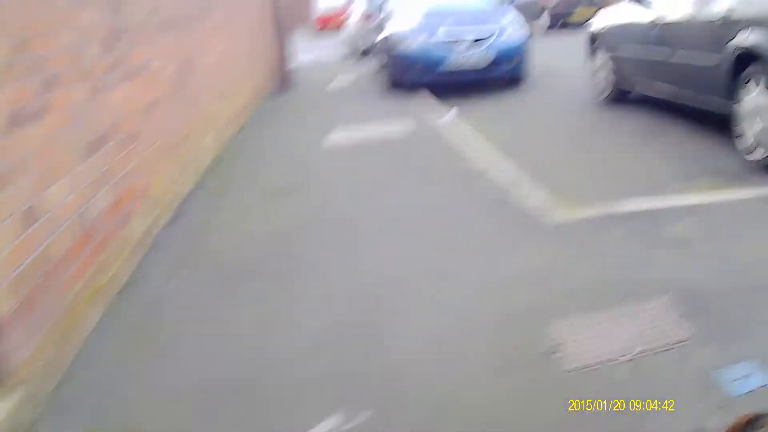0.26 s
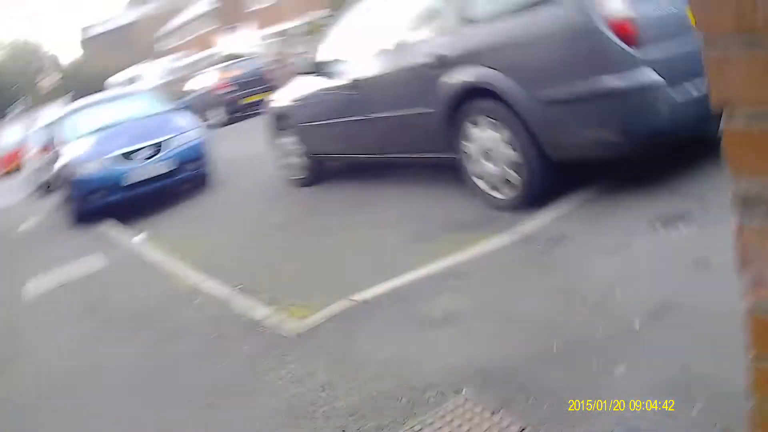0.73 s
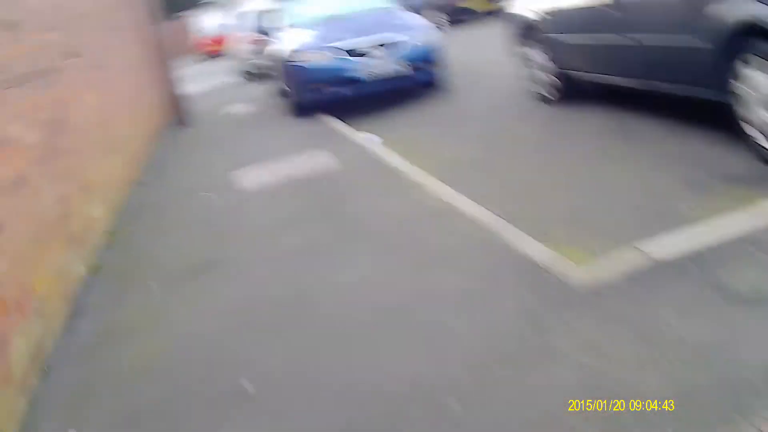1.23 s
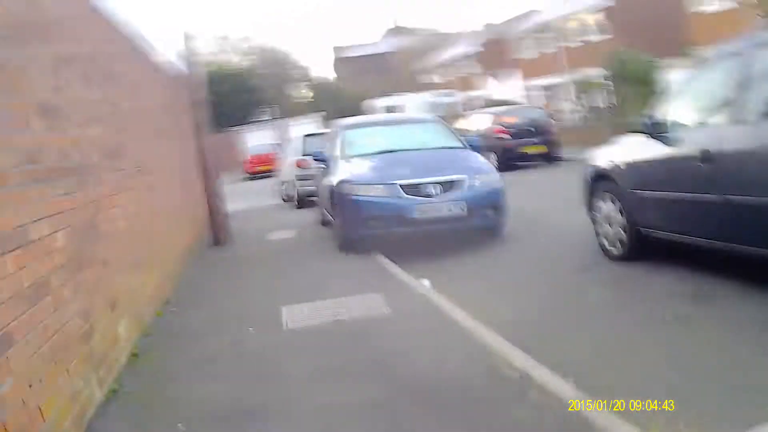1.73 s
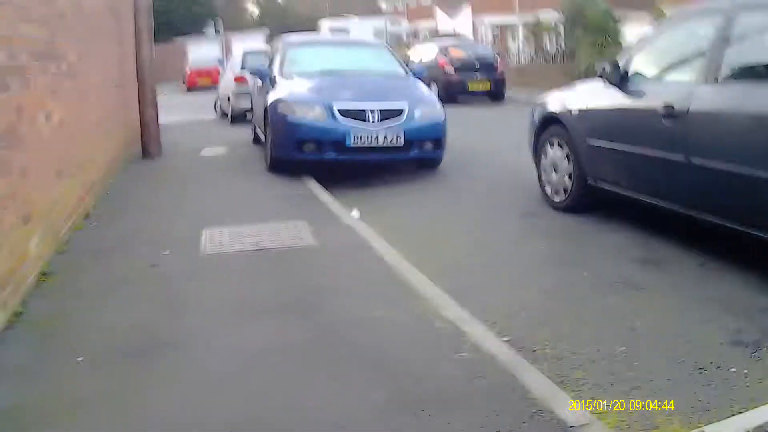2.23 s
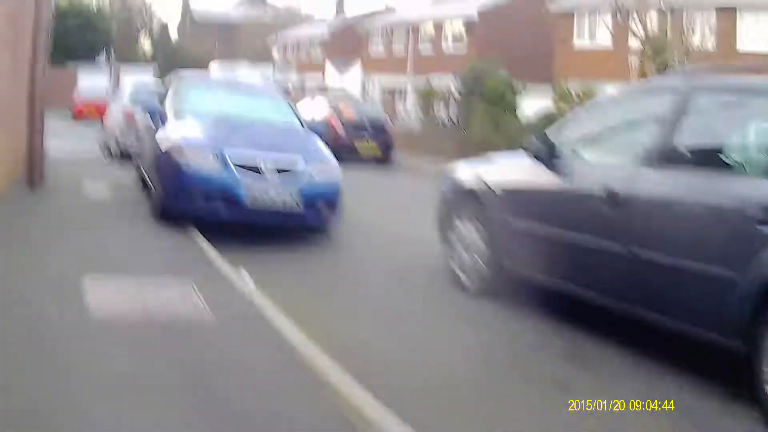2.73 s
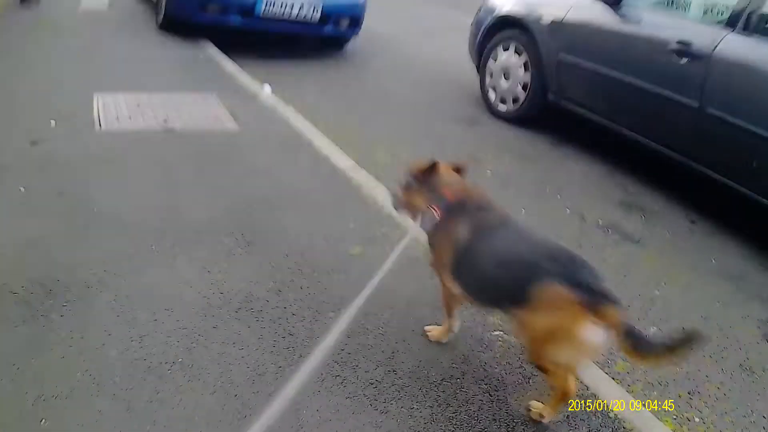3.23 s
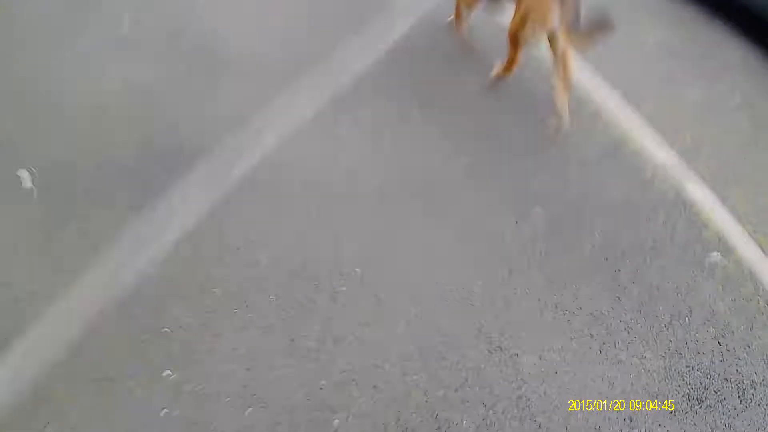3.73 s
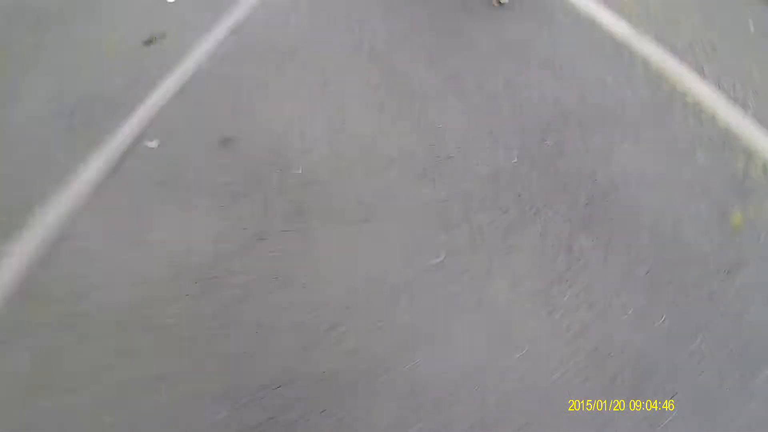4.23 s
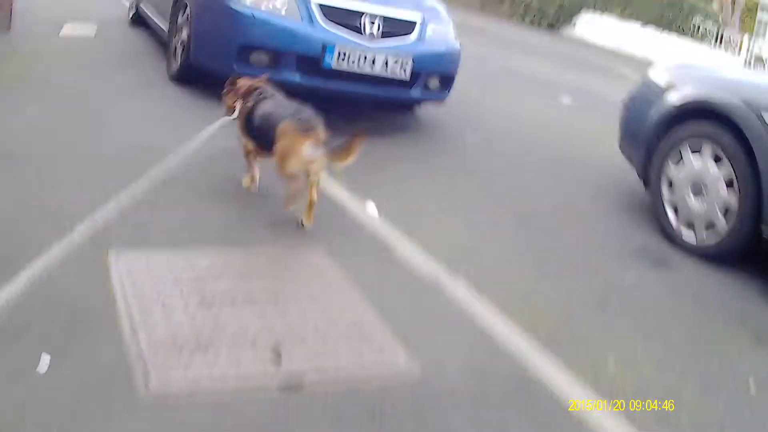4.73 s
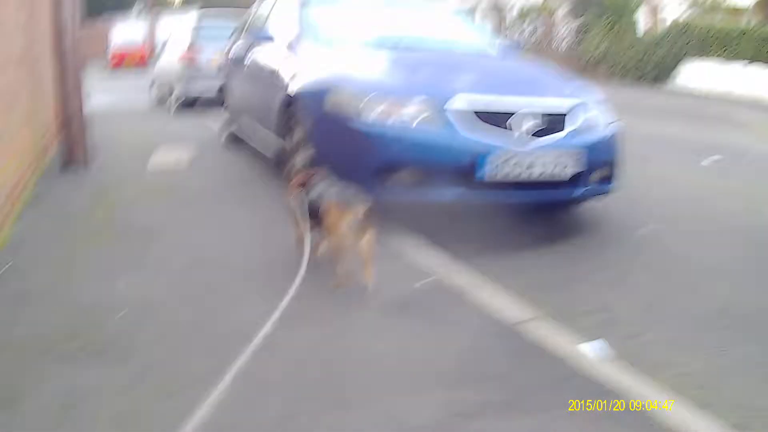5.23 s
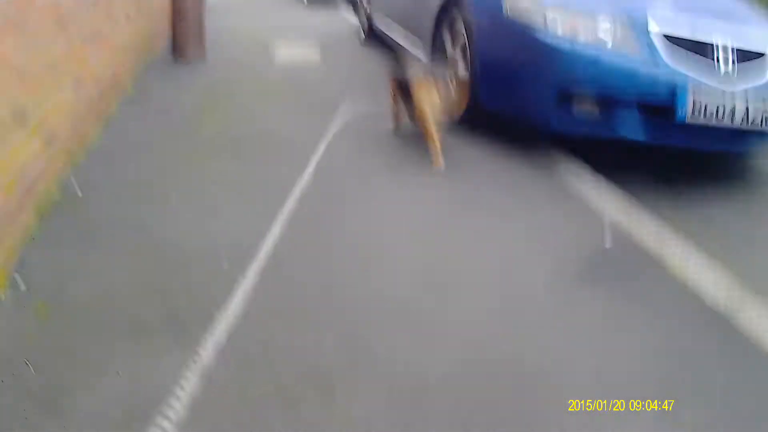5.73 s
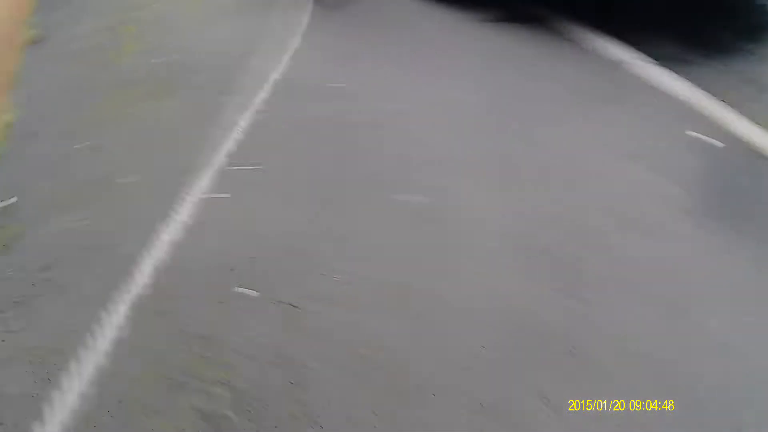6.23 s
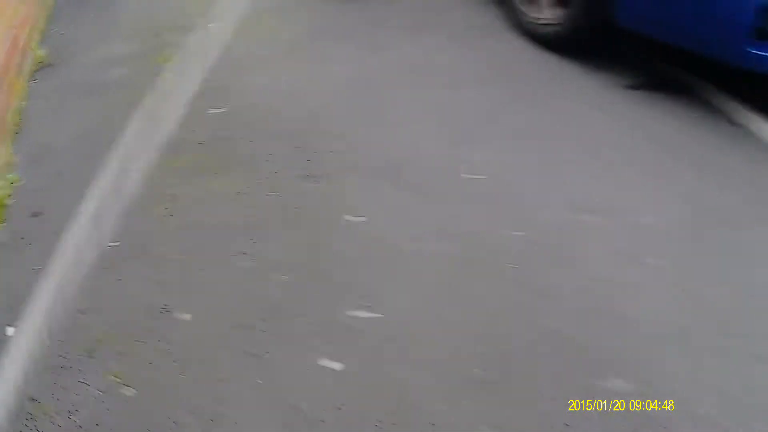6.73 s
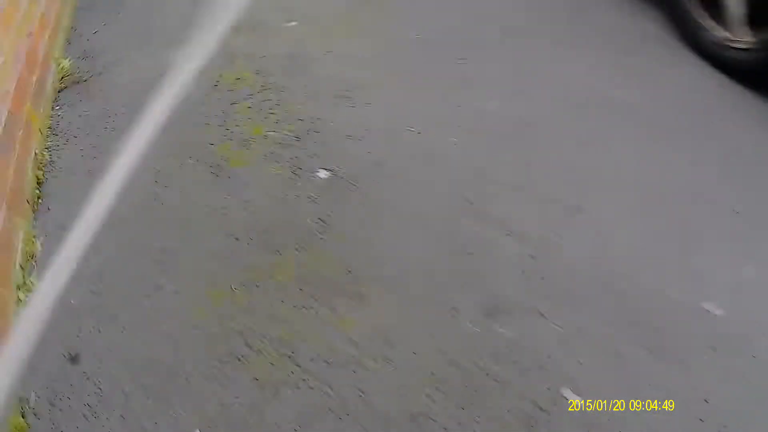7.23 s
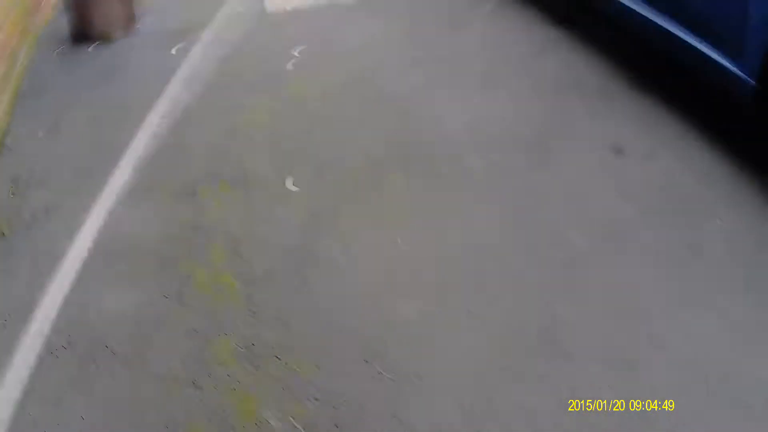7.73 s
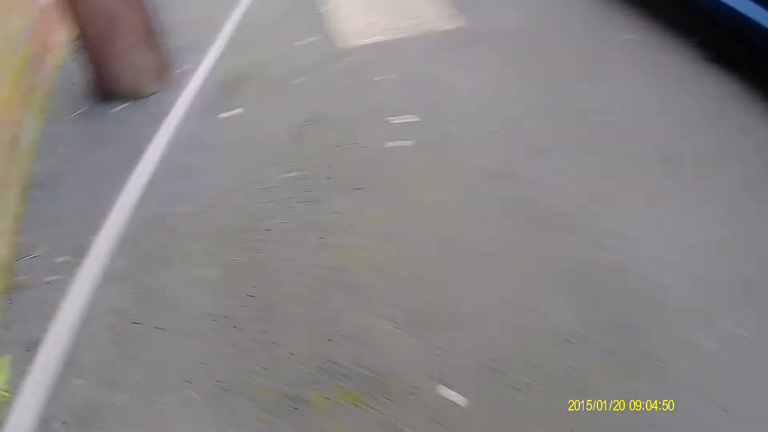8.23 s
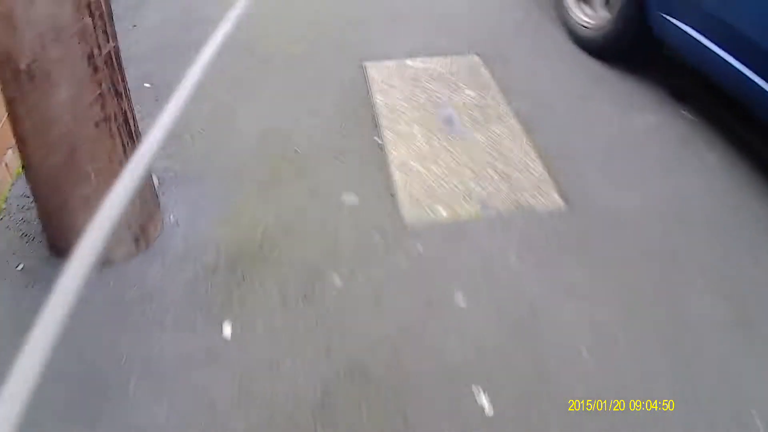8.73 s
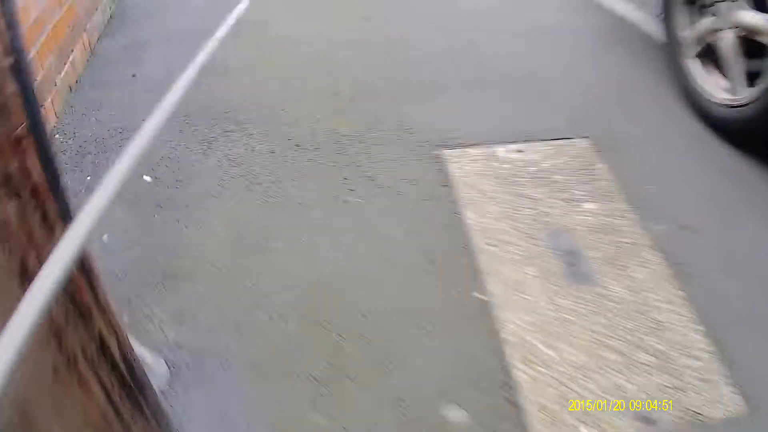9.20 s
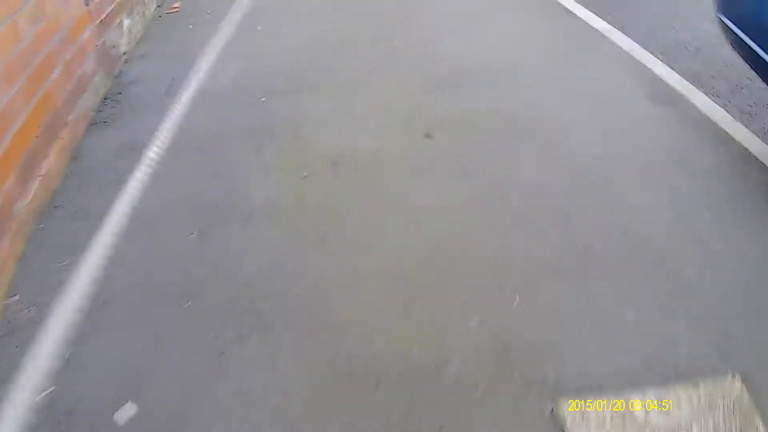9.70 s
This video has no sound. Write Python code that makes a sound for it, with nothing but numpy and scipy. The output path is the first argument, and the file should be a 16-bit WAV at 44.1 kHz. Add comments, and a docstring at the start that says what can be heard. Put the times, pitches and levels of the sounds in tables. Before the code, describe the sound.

Outdoors on a quiet paved street, a body-worn microphone catches fabric brushing in short, dry, irregular strokes. The roughest rubbing and plasticky knocks come in the second and third seconds, followed by tiny high metal clinks from the lead and soft low bumps. Afterwards it is much quieter: sparse scuffs, dull taps, fine ticks and one muffled blow late on, over low wind and distant hiss.

```python
"""A walker with a dog on a lead goes along a quiet paved lane, a small camera worn on the body.
Clothing rubs lightly over the camera, a lead part clinks, grit and claws tick; from 1.6 s the rubbing
is at its loudest, blows ring the casing around 2 and 2.5 s and the camera bumps the body.
A run of clinks follows from 3.3 to 4 s, then the rubbing thins out, with one dull blow at 7.7 s.
Under it all: noise-made wind on the microphone, a far hum of wavering pitch and the hiss of the street."""
import sys
import numpy as np
from scipy import signal
from scipy.fft import rfft, irfft
from scipy.io import wavfile
from scipy.ndimage import uniform_filter1d

SR = 44100
rng = np.random.default_rng(int(sys.argv[2]) if len(sys.argv) > 2 else 0)


def waveform_to_disk(signal):
    """Save audio, clipped to [-1, 1], as 16-bit WAV at the path in sys.argv[1]."""
    frames = np.transpose(np.atleast_2d(signal))
    scaled = np.clip(frames, -1, 1) * 32767
    samples = np.round(scaled).astype(np.int16)
    wavfile.write(sys.argv[1], SR, samples)


N = 439236
EDGE_HZ = 12900  # upper band limit

# colours of cloth and casing noise, relative spectra: f/Hz, level/dB per Hz
DULL_COLOUR = [(300, -38), (500, -15.5), (660, -7), (750, -10.5), (840, -0.5), (972, 0.5), (1250, -9),
               (1530, -5), (1790, -22), (2050, -7), (2120, -8), (2290, -13), (2800, -27), (3400, -43.5)]
SCRATCH_COLOUR = [(2200, -26), (2600, -6.5), (3230, -7), (4100, -2), (4500, -4.5), (5500, -7), (6000, -23)]
BRIGHT_COLOUR = [(5000, -32.5), (5700, -6.5), (6100, -2), (6700, -1.5), (7400, -2), (8500, 4), (9600, -4),
                 (11500, -5), (13500, -11)]
# light rustle between the strokes: t/s, dull rub level/dB, bright swish against it/dB
RUSTLE_LEVELS = [(0, -87, 14), (.5, -76, 5), (1.2, -72.5, 3.5), (2, -64.5, 1), (2.7, -64.5, -2),
                 (3.1, -70, 5), (3.6, -70, -2.5), (4.5, -73, -3.5), (5.2, -74.5, -4), (6.2, -79.5, -4),
                 (7.2, -77, -2.5), (8.3, -79, -0.5), (8.9, -77, -6.5), (9.15, -86, 0), (9.96, -72.5, -6)]


def amp(db):
    """Gain of a level in dB."""
    return 10 ** (np.asarray(db) / 20)


def evened(x):
    """Scales to rms 1."""
    return x / np.sqrt(np.mean(x ** 2) + 1e-20)


def curve(table):
    """Columns of a table after its times, drawn out to one value a sample."""
    s, *columns = np.transpose(table)
    return [np.interp(np.arange(N) / SR, s, c) for c in columns]


def coloured(x, points):
    """Filters x by a spectrum, drawn over log frequency, and scales it to rms 1."""
    f, db = np.transpose(points)
    hz = np.fft.rfftfreq(len(x), 1 / SR)
    gain = amp(np.interp(np.log(hz + 1), np.log(f + 1), db, -90, -90))
    return evened(irfft(rfft(x) * gain, len(x)))


def flicker(per_s):
    """Slow random curve of rms 1, with per_s new points a second."""
    points = rng.standard_normal(N // 40 + 2)
    at = np.arange(N) * per_s / SR
    return evened(np.interp(at, np.arange(len(points)), points))


def add(mix, s, sound):
    """Mixes a sound in at time s."""
    part = mix[round(s * SR):][:len(sound)]
    part += sound[:len(part)]


def ring(modes, t, rise):
    """Sum of dying sines (f/Hz, level/dB, t60/s) that build up over the contact time."""
    sines = sum(amp(db - 60 * t / t60) * np.sin(2 * np.pi * hz * t) for hz, db, t60 in modes)
    return sines * (1 - np.exp(-t / rise))


def snaps(low_hz, high_hz, per_s, t60):
    """Tiny ringing clicks of scattered size, at random times on eight pitches, rms 1."""
    t, out = np.arange(512) / SR, np.zeros(N)
    for hz in np.geomspace(low_hz, high_hz, num=8):
        sizes = amp(4.0 * np.minimum(rng.exponential(1, N), 4))
        train = sizes * (rng.random(N) < per_s / SR / 8)
        out += signal.oaconvolve(train, ring([(hz, 0, t60)], t, .0001))[:N]
    return evened(out)


def clothing():
    """Fibres catch and slip: clumped noise whose colour shifts in patches, with snaps on top."""
    patch_db, scratch_db = 2.5, -8.5  # depth of the swish's colour patches, gain of the scratch
    dull_gain, scratch_gain, bright_gain = pressure()
    clumps = flicker(per_s=70)

    dull = coloured(rng.standard_normal(N), DULL_COLOUR) + 0.31 * snaps(920, 2150, 150, .018)
    dull *= dull_gain * amp(2.0 * clumps + .8 * flicker(per_s=90))

    scratch = coloured(rng.standard_normal(N), SCRATCH_COLOUR) + .5 * snaps(2700, 5200, 200, 0.0018)
    scratch *= scratch_gain * amp(scratch_db + 0.63 * clumps)

    z = signal.stft(coloured(rng.standard_normal(N), BRIGHT_COLOUR), SR, nperseg=256)[2]
    # random gains, smoothed over frequency and then over time
    patches = uniform_filter1d(rng.standard_normal(z.shape), size=8, axis=0)
    patches = evened(uniform_filter1d(patches, size=12, axis=1))
    patchy = signal.istft(z * amp(patch_db * patches), SR, nperseg=256)[1][:N]
    swish = evened(patchy) + 0.3 * snaps(6000, 14000, 200, 0.0061)
    swish *= bright_gain * amp(1.9 * clumps)
    return dull + scratch + swish


def pressure():
    """Gains of dull rub, scratch and swish: arched strokes over the light rustle, summed as power."""
    # strokes of clothing across the camera:
    # start t/s, length/s, dull rub level/dB before the arch, bright swish against it/dB
    rubs = [(0.0, 0.16, -69.5, -1), (0.525, 0.093, -68, 1), (0.628, 0.07, -69.5, 2.5),
            (0.716, 0.16, -63, 0), (1.022, 0.12, -61.5, 0), (1.107, 0.087, -62, 1),
            (1.23, 0.044, -65.5, -2), (1.296, 0.17, -60, -1), (1.6, 0.04, -53, 0), (1.664, 0.062, -56.5, 6),
            (1.743, 0.11, -55.5, 9.5), (1.895, 0.037, -61, 13), (1.958, 0.026, -61, 4),
            (2.01, 0.019, -58, -8), (2.056, 0.028, -48.5, -24), (2.09, 0.043, -48, 3.5),
            (2.111, 0.065, -59.5, 0), (2.206, 0.058, -55, 9), (2.307, .09, -58, 6),
            (2.444, 0.11, -49, 10.5), (2.496, 0.055, -41, -10), (2.583, 0.13, -63, 7.5),
            (2.78, .17, -56.5, 3.5), (2.89, 0.062, -64, 13.5), (2.924, 0.049, -58, 14),
            (3.206, 0.17, -63.5, -0.5), (3.302, 0.16, -62.5, -1), (3.449, 0.049, -60, 7.5),
            (3.664, 0.035, -56, -0.5), (3.745, 0.22, -69, -12.5), (3.987, 0.13, -63, 1.5),
            (4.16, 0.26, -65.5, 0), (4.434, 0.014, -64.5, 6.5), (4.688, 0.12, -63.5, -1.5),
            (4.957, 0.14, -65, 5), (5.198, 0.15, -76.5, 2), (5.381, 0.089, -54, 3),
            (5.588, 0.15, -59.5, -4), (5.725, 0.068, -58.5, -3), (5.786, 0.17, -59, -4),
            (6.014, 0.059, -61.5, -0.5), (6.268, 0.057, -74, 6), (6.53, 0.096, -70.5, -12.5),
            (6.68, 0.11, -72.5, -7), (6.927, 0.07, -69.5, -6), (7.052, 0.034, -77.5, 8),
            (7.382, 0.033, -67, -3), (7.461, 0.051, -64.5, -3), (7.604, 0.22, -75, -1),
            (7.727, 0.069, -67, -19), (7.854, 0.04, -69.5, -7), (8.004, 0.036, -72.5, 1.5),
            (8.134, 0.056, -66.5, -1), (8.224, 0.072, -70.5, 4), (8.382, 0.044, -71, -7),
            (8.46, 0.029, -67, 1), (8.676, 0.051, -70.5, -7), (9.213, 0.15, -70.5, -5.5),
            (9.314, 0.2, -69.5, -4.5), (9.593, 0.072, -68.5, -3.5), (9.726, 0.041, -74, 0),
            (9.85, 0.16, -72, -7)]
    arch_db, peak_at = 12, 0.3  # drop at the ends of a stroke, share of its length where it is strongest
    rise_db_per_s, fall_db_per_s = 898.5, 599.5  # slopes outside the ends
    shares = np.array([[0], [0.23], [1]])  # how far each layer follows the swish column
    rustle_db, against_db = curve(RUSTLE_LEVELS)
    power = amp(rustle_db + shares * against_db) ** 2
    for s, length, db, bright_db in rubs:
        first = max(round((s - .1) * SR), 0)
        last = min(round((s + length + .15) * SR), N)
        at = np.arange(first, last)
        t = at / SR - s
        bow_db = -arch_db * np.interp(t / length, [0, peak_at, 1], [1, 0, 1]) ** 2
        ends_db = rise_db_per_s * np.minimum(t, 0) - fall_db_per_s * np.maximum(t - length, 0)
        power[:, at] += amp(db + shares * bright_db + bow_db + ends_db) ** 2
    return np.sqrt(power)


def knocks():
    """Each blow rings the parts of the casing by its own shares, fills the lows with a dull puff and cracks."""
    # blows on the casing: t/s, main ring level/dB,
    # then against it: boom/dB, thud/dB, lower shell/dB, upper shell/dB, crack/dB
    blows = [(1.9493, -1.5, -27, -14.5, -16, -5.5, -13.5), (2.1112, -10, -9, -1, -12, -20, -10.5),
             (2.4859, -16, -17.5, -5.5, -2, 0.5, -13), (2.498, -22.5, -17.5, -2, -8.5, -11, -26),
             (7.7312, -37, -7, 9, -5.5, -6, -12)]
    # modes of main ring, boom, thud, lower shell, upper shell, rim in turn: f/Hz, level/dB, t60/s
    casing = [
        [(2082, 0.5, 0.03), (2101, -31, 0.097)],
        [(75, -1.5, .05)],
        [(185, -8, 0.025), (268.5, -10, 0.021), (404.3, -5.5, 0.017), (500, -5, 0.011), (670, -1, 0.022),
         (980, -1.5, .012), (1200, -2.5, .011)],
        [(1560, -1, 0.025)],
        [(2385, -1.5, 0.016), (2560, -12, .01)],
        [(4100, -5, 0.0071), (4300, -5, 0.006), (4470, -2, 0.012)],
    ]
    # sign of each part: the shells swing against the main ring
    swing = [1, 1, 1, -1, -1, 1]
    rim_db = 4.5  # the rim rings with the crack
    out, t = np.zeros(N), np.arange(SR // 6) / SR
    noise = rng.standard_normal((len(blows), 3, len(t)))
    for (s, db, boom_db, thud_db, lower_db, upper_db, crack_db), (a, b, c) in zip(blows, noise):
        shares = amp([0, boom_db, thud_db, lower_db, upper_db, crack_db + rim_db]) * swing
        body = sum(share * ring(modes, t, .0003) for share, modes in zip(shares, casing))
        puff = coloured(a, DULL_COLOUR) * amp(thud_db - 3.0 - 60 * t / 0.018)
        crack = coloured(b, BRIGHT_COLOUR) + 0.86 * coloured(c, SCRATCH_COLOUR)
        crack *= amp(crack_db + 1.5 - 60 * t / 0.015)
        onset = 1 - np.exp(-t / .0005)
        add(out, s, amp(db) * (body + (puff + crack) * onset))
    return out


def bumps():
    """The camera softly bumps the body: one low push and its rebound under a bell-shaped window."""
    # soft bumps: middle t/s, level of the bell's top/dB, f/Hz
    pushes = [(1.613, -37, 133), (2.069, -37, 292), (3.217, -50, 164.6), (3.291, -53, 148),
              (3.401, -45.5, 186), (3.446, -45.5, 148), (3.628, -53, 197), (3.693, -49.5, 243),
              (3.856, -41.5, 187), (3.898, -45.5, 183), (4.016, -37.5, 190), (4.234, -70, 173),
              (5.425, -47, 151.8), (6.614, -51, 162.8), (6.89, -48.5, 203), (7.389, -52, 220.5),
              (8.396, -53, 164), (9.026, -46, 160.5), (9.414, -53.5, 207), (9.915, -52.5, 162.8)]
    bell_cycles = 0.75  # width of the bell between its 1/e points
    out, t = np.zeros(N), np.arange(-1024, 1024) / SR
    for s, db, hz in pushes:
        bell = np.exp(-(2 * t * hz / bell_cycles) ** 2)
        add(out, s + t[0], amp(db) * bell * np.cos(2 * np.pi * hz * t + np.pi / 4))
    return out


def lead():
    """Small metal parts of the lead ring high, with a rattle at the strike."""
    # clinks: t/s, level/dB, f/Hz, t60/s, rattle against the level/dB
    clinks = [(0.2386, -40.5, 5290, 0.036, -2.5), (3.2568, -42.5, 9100, 0.019, -6.5),
              (3.285, -30, 9160, 0.08, -12), (3.3263, -29, 8100, 0.032, -8),
              (3.331, -31, 11600, 0.021, -18), (3.35, -46, 8500, .03, -8), (3.3674, -50, 8900, 0.02, -4),
              (3.386, -30.5, 10360, 0.016, -9), (3.39, -44, 11100, .06, -2), (3.453, -44, 12630, 0.045, 2),
              (4.014, -39.5, 8900, 0.011, 2.5), (4.054, -44, 12340, 0.034, -4)]
    # partials of a clink, the close pair beats: factor on f, level/dB
    partials = [(1, -5), (1.002, -5), (.645, -21), (1.36, -23)]
    out, t = np.zeros(N), np.arange(SR // 6) / SR
    rattles = rng.standard_normal((len(clinks), len(t)))
    for (s, db, hz, t60, rattle_db), noise in zip(clinks, rattles):
        modes = [(hz * k, d, t60) for k, d in partials if hz * k < EDGE_HZ]
        rattle = coloured(noise, BRIGHT_COLOUR) * amp(rattle_db - 60 * t / .015)
        add(out, s, amp(db) * (ring(modes, t, 0.001) + rattle))
    return out


def ticks():
    """Grit, claws and small taps: a short noise burst around its centre pitch under a bright click."""
    # ticks: t/s, burst level at the strike/dB, centre f/Hz, bright click against the burst/dB
    taps = [(.364, -54, 1110, -24), (.538, -53.5, 2260, 1), (.665, -55.5, 10300, 7.5),
            (.907, -53, 5730, -19), (.959, -53, 8500, -12), (1.001, -45, 5400, -16),
            (1.492, -47.5, 2330, -0.5), (1.562, -56, 8300, 7), (1.599, -44, 6300, -8),
            (1.619, -37.5, 6900, -3.5), (1.87, -43, 10200, -3), (1.881, -50, 3100, -4),
            (1.905, -47, 3820, -4), (1.917, -48, 4500, -4), (2.036, -43.5, 700, -22),
            (2.068, -33, 800, -21), (2.1, -38, 2080, -23), (2.217, -49, 7430, -12), (2.265, -45, 3970, 2),
            (2.323, -40, 9500, -15), (2.374, -34.5, 5440, -18), (2.416, -50.5, 3100, 7.5),
            (2.645, -45.5, 950, -12), (2.787, -40.5, 940, -6), (2.838, -38, 894, -23),
            (3.185, -57, 3250, -2), (3.206, -54, 9300, -0.5), (3.219, -56, 9500, -6),
            (3.374, -50, 8600, -3), (3.381, -43.5, 3200, -4), (3.413, -54, 920, 4), (3.445, -41.5, 835, -8),
            (3.542, -46.5, 895, -20), (3.586, -47.5, 827, 3), (3.673, -46.5, 840, -5),
            (3.818, -54, 888, -0.5), (3.976, -61.5, 907, 11.5), (4.04, -53, 10500, -6),
            (4.068, -43.5, 10800, -9), (4.184, -60, 845, 4), (4.259, -47.5, 7700, -5),
            (4.434, -55, 906, -1.5), (4.599, -53, 1070, -1), (4.801, -45.5, 934, -28),
            (4.713, -59, 8000, -4), (4.949, -58.5, 8600, -5), (5.011, -51.5, 850, -11),
            (5.058, -52.5, 986, 0), (5.093, -57, 694, 2), (5.473, -67, 840, 0), (5.544, -55.5, 800, -20),
            (6.031, -55, 870, -13), (6.271, -59.5, 950, 3), (6.543, -46.5, 1074, -21),
            (6.708, -54.5, 1000, -6), (6.799, -52.5, 1450, -16), (6.892, -51, 1370, -18),
            (6.96, -55, 2330, -5.5), (7.086, -49.5, 930, -17), (7.13, -56, 1006, -5),
            (7.193, -61, 1000, -5.5), (7.248, -61, 1160, 2.5), (7.289, -48.5, 970, -16),
            (7.401, -56, 2970, -2.5), (7.477, -52.5, 910, 0.5), (7.628, -68, 950, 2.5),
            (7.766, -54, 880, -15.5), (7.859, -63, 1030, 6.5), (8.013, -64, 1114, 5),
            (8.146, -51.5, 8230, -22.5), (8.238, -62.5, 877, 7), (8.689, -44.5, 4690, -4.5),
            (8.714, -52, 4930, -1), (8.348, -61, 6400, -4), (8.738, -57, 1270, -4), (9.021, -62, 925, -10),
            (9.223, -52.5, 5070, -12), (9.35, -60.5, 956, 1), (9.519, -56.5, 887, -0.5),
            (9.631, -48.5, 8430, 2.5), (9.738, -58.5, 7320, -1), (9.854, -48, 1023, -14),
            (9.939, -53, 845, -6)]
    burst_t60, click_t60 = 0.014, 0.015  # s
    click_colour = [(1200, -31.0), (2500, 3.0), (5000, 1.5), (9000, -2.0), (13500, -20.0)]  # f/Hz, dB per Hz
    out, t = np.zeros(N), np.arange(2048) / SR
    bursts = rng.standard_normal((len(taps), 2, len(t)))
    for (s, db, hz, click_db), (a, b) in zip(taps, bursts):
        band = coloured(a, [(hz * .4, -30), (hz * .8, -4), (hz, 0), (hz * 1.2, -5), (hz * 3.5, -30)])
        click = coloured(b, click_colour)
        burst = amp(db - 60 * t / burst_t60) * band
        add(out, s, burst + amp(db + click_db - 60 * t / click_t60) * click)
    return out


def grit():
    """Faint scattered ticks of small stones under paws and soles, and dull taps heard through the casing."""
    rustle_db = curve(RUSTLE_LEVELS)[0]
    busy = amp(.5 * (rustle_db - rustle_db.mean()))  # follows half of the rustle's level changes
    stones = amp(-78) * snaps(830, 11000, 90, .003)
    dull_taps = amp(-83) * snaps(830, 1150, 12, .02)
    return busy * (stones + dull_taps)


def wind():
    """Wind on the microphone: lumpy low pressure noise with short buffets."""
    # steady wind before the flutter: t/s, level/dB
    wind_levels = [(0, -68), (.6, -68), (1.3, -70), (2, -60), (2.4, -62), (3.1, -65), (3.5, -59.5),
                   (4.6, -61), (5.3, -64), (5.7, -54), (6.1, -60.5), (6.45, -66), (7.1, -60.5), (7.6, -65),
                   (8.0, -61), (8.6, -74), (9.1, -65.5), (9.96, -61)]
    # short buffets before the flutter: middle t/s, peak level/dB
    buffets = [(.83, -60), (1.13, -69), (1.4, -64), (1.61, -50), (1.775, -52), (3.275, -52), (3.82, -52),
               (4.215, -57.5), (4.39, -60), (5.049, -65), (5.4, -58), (8.41, -58.5), (8.52, -59.5),
               (8.764, -58), (8.88, -56.5), (9.501, -59.5)]
    # relative spectrum: f/Hz, level/dB per Hz
    gust_colour = [(12, -3.5), (22, -1), (45, -4), (80, -8.5), (140, -16), (300, -28)]
    half_width = 0.031  # s, from the middle of a buffet to 1/e
    t = np.arange(N) / SR
    level = amp(curve(wind_levels)[0])
    level += sum(amp(db) * np.exp(-((t - s) / half_width) ** 2) for s, db in buffets)
    flutter = amp(0.78 * flicker(per_s=17))
    return level * flutter * coloured(rng.standard_normal(N), gust_colour)


def hum():
    """A far hum: a narrow band of noise, shifted up to a pitch that wavers."""
    # t/s, f/Hz, level/dB
    hum_path = [(0, 190, -66), (.4, 185, -62.5), (.75, 190, -64.5), (.95, 200, -74), (1.3, 205, -70.5),
                (1.6, 230, -56), (1.9, 220, -67.5), (2.3, 205, -63), (2.6, 235, -55.5), (2.95, 230, -63.5),
                (3.3, 230, -76), (4.5, 230, -76), (5.2, 240, -67), (6, 200, -73), (6.8, 205, -71),
                (7.6, 210, -69), (8.5, 205, -70), (9.3, 200, -71), (9.96, 200, -74.5)]
    hz, db = curve(hum_path)
    r = np.exp(-np.pi * 45 / SR)  # double pole that keeps the band narrow
    band = rng.standard_normal(N) + 1j * rng.standard_normal(N)
    band = signal.lfilter([1], [1, -2 * r, r ** 2], band)
    carrier = np.exp(2j * np.pi * np.cumsum(hz) / SR)
    return amp(db) * evened((band * carrier).real)


def street():
    """Steady distant hiss of filtered noise that swells a little."""
    # relative spectrum: f/Hz, level/dB per Hz
    street_colour = [(35, -30), (60, -2), (138, -6.5), (194, -2), (374, -15.5), (562, -21.5), (967, -18.5),
                     (1740, -30.5), (2330, -25.5), (4920, -29.5), (8460, -31), (10100, -35.5),
                     (11400, -25.5), (13300, -63)]
    swell = amp(-68 + 0.63 * flicker(per_s=4.3))
    return swell * coloured(rng.standard_normal(N), street_colour)


def scene():
    """All sources reach one microphone."""
    handling = clothing() + knocks() + bumps()
    walk = lead() + ticks() + grit()
    background = wind() + hum() + street()
    return (handling + walk + background)[None]


def record(dry):
    """Loud peaks overload the input softly, upward swings first; then the band limit."""
    ceiling = np.where(dry > 0, .52, .75)
    bent = dry / (1 + abs(dry / ceiling) ** 4) ** .25
    lowpass = signal.firwin(511, EDGE_HZ, window=("kaiser", 9), fs=SR)
    return signal.oaconvolve(bent, lowpass[None], "same")


dry = scene()
out = record(dry)
waveform_to_disk(out)
```